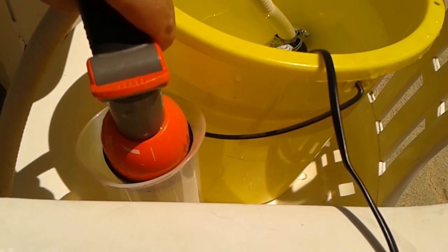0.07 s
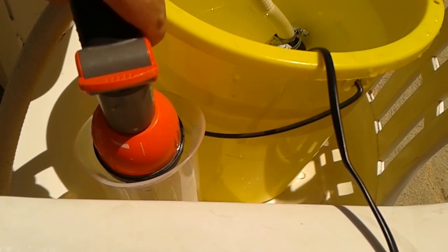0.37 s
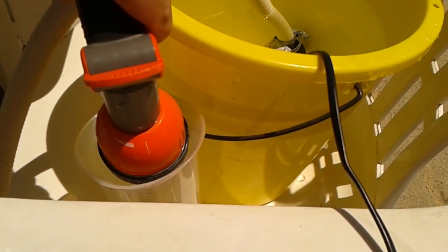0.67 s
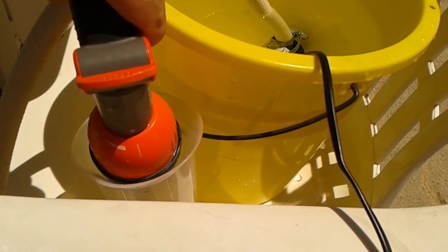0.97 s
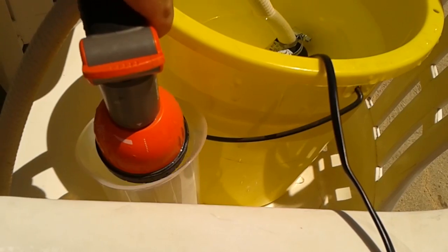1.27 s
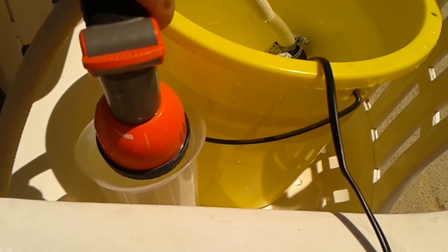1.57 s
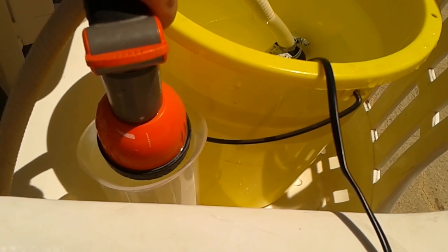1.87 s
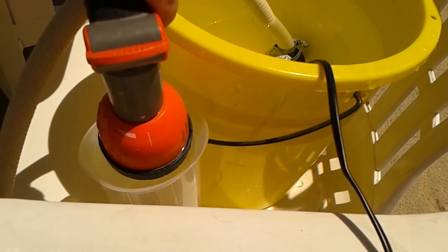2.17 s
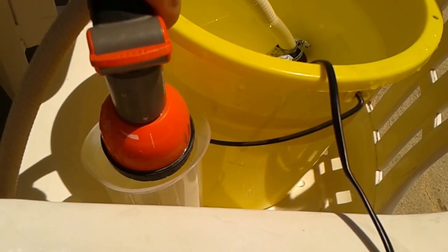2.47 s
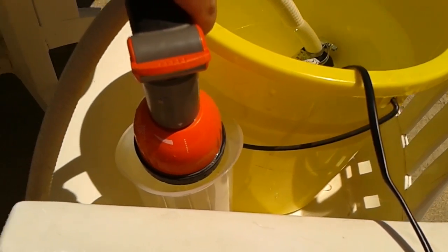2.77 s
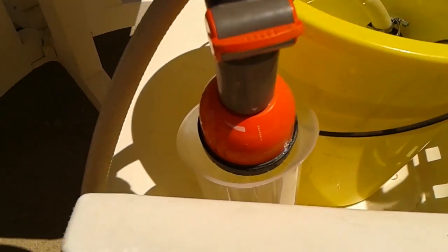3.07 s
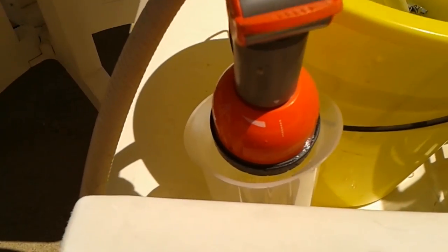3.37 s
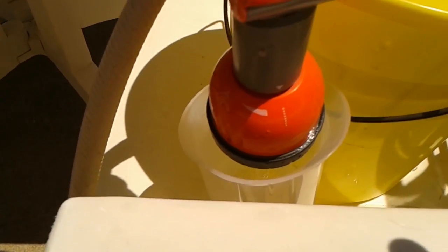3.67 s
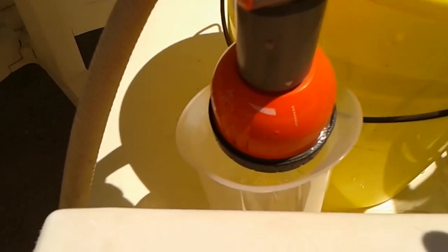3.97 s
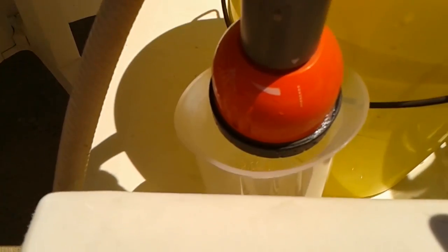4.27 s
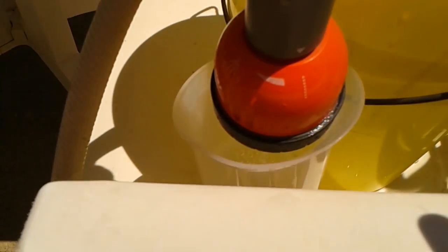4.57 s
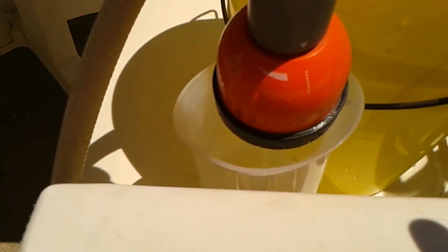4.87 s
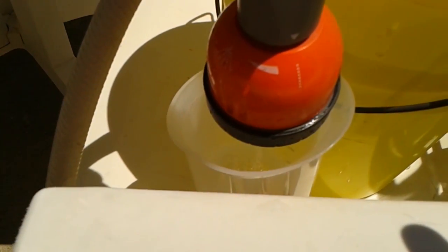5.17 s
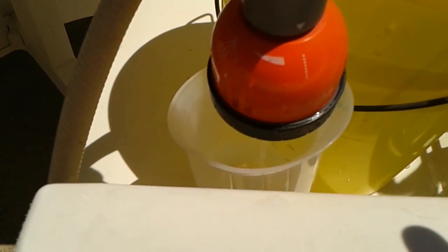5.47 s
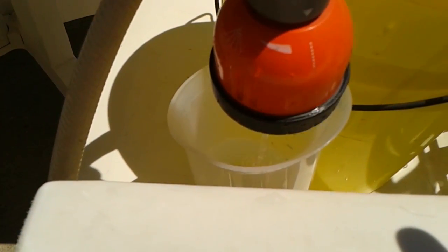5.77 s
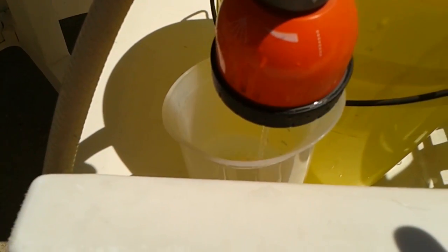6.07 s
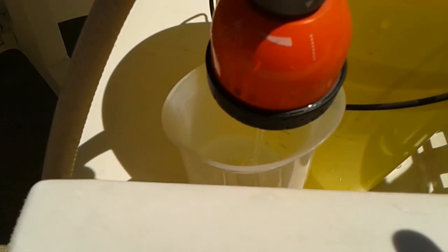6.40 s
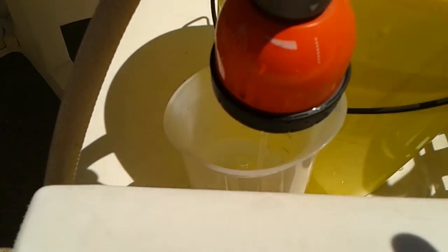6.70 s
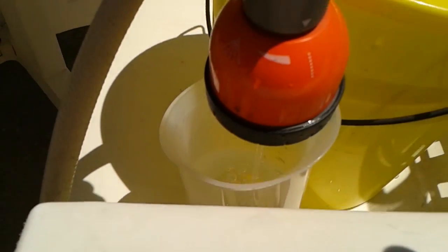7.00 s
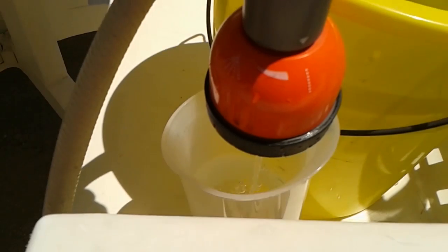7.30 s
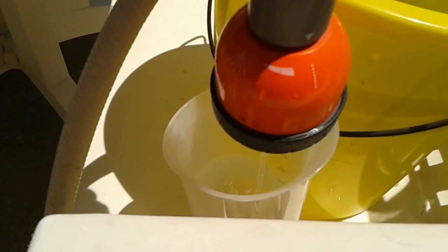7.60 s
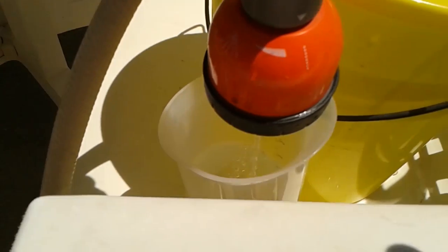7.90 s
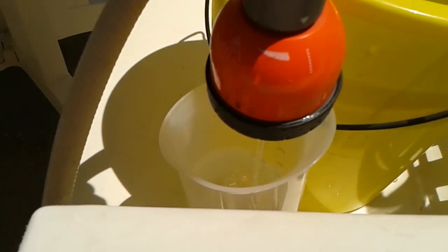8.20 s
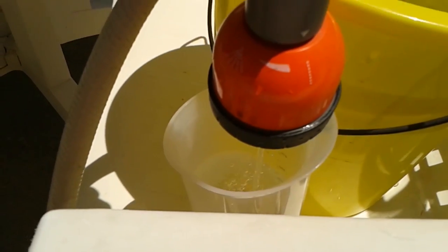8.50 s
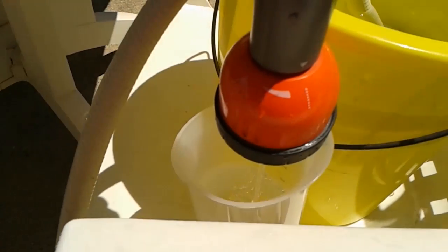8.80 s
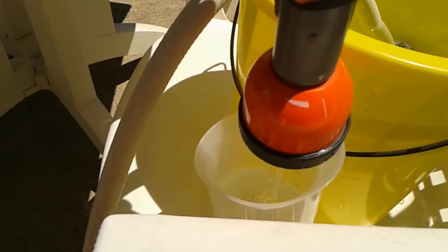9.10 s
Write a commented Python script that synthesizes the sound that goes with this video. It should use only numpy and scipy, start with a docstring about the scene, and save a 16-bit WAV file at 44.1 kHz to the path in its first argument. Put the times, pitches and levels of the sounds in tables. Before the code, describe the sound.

Water trickles and sprays lightly from a hose nozzle into a plastic cup outdoors, while gusts of wind rumble on the microphone.

```python
"""A hand-held nozzle trickles and sprays water into a plastic cup, outdoors.
At first it sits in the mouth of the cup: drops plip as their air pockets oscillate, over patter and hiss,
and the enclosed air rings at narrow resonances while gusts thump the microphone. The wind eases, and by
4.5 s the nozzle is lifted nearly clear, leaving the broader resonances of the open cup. The gusts return
and larger air pockets gulp under the stream. From 8 s the spray fizzes more and the wind buffets hard."""
import sys
import numpy as np
from scipy import signal
from scipy.fft import rfft, irfft, next_fast_len
from scipy.io import wavfile
from scipy.ndimage import uniform_filter1d

SR = 44100
rng = np.random.default_rng(int(sys.argv[2]) if len(sys.argv) > 2 else 0)


def pcm_store(signal):
    """Save signal as 16-bit PCM."""
    levels = np.round(np.clip(np.atleast_2d(signal), -1, 1) * 32767)
    wavfile.write(sys.argv[1], SR, levels.astype(np.int16).T)


N = 407925

# Strength of the spray, in relative levels: t/s, patter/dB, fizz/dB, wash/dB
SPRAY = [(0.0, -38.5, -58.5, -49.5), (1.59, -41, -59.5, -48.5), (2.13, -45, -60, -50.5),
         (3.06, -41, -61.5, -48.5), (3.63, -43.5, -60, -49), (3.89, -40.5, -60.5, -48.5),
         (4.4, -41.5, -61, -49.5), (4.82, -39, -61.5, -47.5), (5.44, -42, -62.5, -49.5),
         (6.9, -43.5, -62.5, -47), (7.57, -41, -58, -47), (8.19, -44.5, -60, -45.5),
         (8.39, -40.5, -59, -46.5), (8.47, -49, -55.5, -43.5), (9.0, -41.5, -55, -46),
         (9.25, -48, -56, -45)]
def water():
    """Source and filter: impacts and air pockets excite the cup; the noise of the spray adds directly."""
    patter_db, fizz_db, wash_db = in_time(SPRAY)
    droplets = patter(per_s=2200, size_db=3.0, clump_db=3.0, cycles=4.9)
    fine = from_db(patter_db - 5.0) * rms_one(cup(droplets, direct_db=-11.0, ring_db=4.5))
    ringing = from_db(patter_db - 17.0) * pings(per_s=140, size_db=-4.5)
    plips = drops(level_db=-1.0, splash_db=-13.5, splash_s=0.022, lead=.38)
    plips = cup(plips, direct_db=3.5, ring_db=-6)
    gulps = glugs(level_db=-2.5, swell_s=0.0067, width_share=0.29, splash_db=-5.5)
    large = wall_echoes(plips + gulps, echo_db=-9.5, t60=0.035)
    hiss = wash(wash_db + 3.0) + fizz(fizz_db + 11.5)
    crackle = spits(level_db=5.0, tick_db=fizz_db + 4, size_db=4.5, tick_s=0.0025)
    return fine + ringing + large + hiss + crackle


def plip(hz, duration):
    """Bubble resonance: a drop's air pocket rings briefly, its envelope peaking at 0.75 durations."""
    t = np.arange(int(5 * duration * SR) + 2) / SR
    age = t / (.75 * duration)
    return (age * np.exp(1 - age)) ** 3 * np.sin(2 * np.pi * hz * t)


# Prominent drops: t/s, relative level/dB, f/Hz, nominal duration/s
DROPS = [(0.0976, -22.5, 1660, 0.00098), (0.202, -27, 4700, 0.00063), (0.205, -30, 1520, 0.0018),
         (0.2385, -31, 1630, 0.0024), (0.344, -29, 4200, 0.0016), (0.398, -32, 2040, 0.0035),
         (0.531, -32, 4930, 0.0014), (0.593, -33, 1800, .0015), (0.6322, -23, 1880, 0.0023),
         (0.6322, -18.5, 3930, 0.00082), (0.642, -29, 3850, 0.0012), (0.752, -30, 4100, 0.00097),
         (0.8115, -28, 2150, 0.00083), (0.831, -29, 1830, 0.0016), (0.993, -38, 1780, .0015),
         (1.053, -26, 2000, 0.00089), (1.231, -29.5, 1570, 0.0015), (1.3835, -40, 1700, .0015),
         (1.397, -32, 1580, 0.002), (1.4265, -32, 1880, .0012), (1.501, -32, 4120, 0.0011),
         (1.509, -26.5, 1420, 0.0011), (1.527, -28, 4340, 0.0025), (1.583, -24, 4500, 0.00072),
         (1.6256, -25, 1880, 0.00085), (1.874, -22, 1690, .0015), (1.876, -31, 1590, .0012),
         (1.904, -30.5, 4300, 0.0015), (2.202, -29.5, 1750, 0.0011), (2.221, -30, 1890, 0.00075),
         (2.2964, -27, 1500, .0028), (2.412, -25.5, 1590, 0.0019), (2.482, -34.5, 1660, 0.0017),
         (2.5395, -33.5, 4630, .0012), (2.5435, -30.5, 1440, 0.0012), (2.578, -27, 1620, 0.0011),
         (2.65, -31, 1580, .0016), (2.868, -23, 1320, 0.0011), (2.876, -21.5, 1540, 0.00097),
         (2.878, -29.5, 1820, 0.0024), (3.077, -32, 1680, .002), (3.09, -27, 1700, 0.0013),
         (3.412, -33, 1860, .002), (3.489, -32, 1800, 0.0012), (3.604, -33.5, 1820, 0.0029),
         (3.844, -30, 4900, 0.00071), (3.859, -31, 3750, .0007), (3.97, -37, 4430, .0012),
         (4.007, -34, 4330, 0.0019), (4.024, -29, 1800, 0.00056), (4.027, -26, 1770, .0013),
         (4.05, -37, 4310, .0012), (4.1133, -33, 4250, .001), (4.148, -32, 1750, 0.002),
         (4.217, -34.5, 5730, .0009), (4.228, -31, 4150, 0.0011), (4.231, -30, 5600, .0008),
         (4.335, -30, 4200, .0008), (4.3513, -25, 4320, 0.0014), (4.4023, -27.5, 4450, 0.00067),
         (4.42, -32, 4500, .0008), (4.507, -30, 1570, 0.0013), (4.5837, -31, 5300, 0.00074),
         (4.671, -33, 4230, 0.002), (4.736, -30, 1850, 0.0015), (4.76, -32, 1660, .0012),
         (4.779, -30, 1560, 0.0013), (4.8814, -27, 1550, .0017), (4.914, -30, 4350, 0.002),
         (4.963, -29, 1880, 0.002), (4.987, -29, 1850, .001), (5.03, -33, 1680, 0.0019),
         (5.053, -31.5, 4300, .0013), (5.137, -36, 5400, .0016), (5.265, -32, 1700, 0.0011),
         (5.3503, -32, 4550, .0014), (5.418, -29, 3960, 0.0012), (5.466, -26, 2000, 0.00056),
         (5.47, -38, 5730, 0.0016), (5.598, -35, 4170, 0.00092), (5.669, -32, 4270, .0013),
         (5.6701, -30, 1580, .0012), (5.69, -28.5, 4450, 0.0015), (5.6976, -28.5, 1440, 0.00099),
         (5.8805, -28, 4400, .001), (6.005, -25, 2010, 0.0017), (6.022, -28, 1730, .0014),
         (6.043, -28.5, 3830, 0.00073), (6.0955, -29, 1950, 0.0017), (6.147, -21, 4300, 0.00062),
         (6.157, -30.5, 1980, 0.0016), (6.156, -34, 3800, .0014), (6.191, -28, 3900, 0.0016),
         (6.1916, -35, 1460, 0.0023), (6.241, -31, 4040, 0.00092), (6.3198, -34, 4360, 0.0011),
         (6.341, -16, 4320, 0.0012), (6.372, -37, 1570, .0025), (6.4445, -30, 4130, 0.0011),
         (6.478, -33, 1330, 0.0066), (6.772, -28, 5000, 0.00038), (6.906, -36, 4640, 0.0015),
         (6.9634, -19.5, 2010, 0.0018), (7.0146, -31.5, 2000, .002), (7.0272, -22.5, 4500, 0.0017),
         (7.289, -29.5, 1920, 0.0015), (7.334, -26, 4270, .0009), (7.387, -28, 4330, 0.0035),
         (7.54, -37, 4380, .0012), (7.634, -27, 4160, 0.00099), (7.641, -29, 1900, 0.0009),
         (7.667, -27, 3780, 0.0012), (7.683, -27.5, 4150, 0.0025), (7.985, -30.5, 4170, .001),
         (8.223, -25.5, 4360, 0.0021), (8.481, -31.5, 4440, 0.0023), (8.51, -42, 4760, .0018),
         (8.5685, -37, 4400, 0.0014), (9.092, -20, 1810, 0.00017), (9.143, -29.5, 4400, 0.0033)]
def drops(level_db, splash_db, splash_s, lead, count=4):
    """Impact and splash: each drop plips amid smaller ones, some just ahead, most thrown up after it."""
    out = np.zeros(N)
    for (s, db, hz, duration), satellites in zip(DROPS + dribble(), rng.random((800, count, 3))):
        add(out, s, from_db(db + level_db) * plip(hz, duration))
        for late, pitch, weak in satellites:
            small_hz = min(hz * 2 ** (pitch - .4), 5200)
            small = from_db(db + splash_db - 13.5 * weak) * plip(small_hz, 3 / small_hz)
            add(out, s + splash_s * (late - lead), small)
    return out


# Two sizes of lesser drop: full rate/(1/s), relative level/dB, f/Hz, spread/octaves, nominal duration/s
LESSER_DROPS = [(24.08, -41, 1755, 0.11, 0.0016), (33.76, -41, 4280, .07, 0.0013)]
# Their flow: t/s, fraction of the full rate
DRIBBLE_FLOW = [(0, .9), (1.3, .55), (2.0, .2), (3.3, .3), (3.8, .7), (4.6, 1), (5.7, .9), (6.7, 0.55),
                (9.25, .45)]
def dribble(spread_db=3.5):
    """Poisson process: lesser drops fall independently at a rate set by the flow; rows as in DROPS."""
    rows, flow = [], in_time(DRIBBLE_FLOW)[0]
    for per_s, db, hz, octaves, duration in LESSER_DROPS:
        times = np.flatnonzero(rng.random(N) < per_s * flow / SR) / SR
        for s, (loud, high) in zip(times, rng.standard_normal((200, 2))):
            rows.append((s, db + spread_db * loud, hz * 2 ** (octaves * high), duration))
    return rows


# Spectrum of the patter: f/Hz, relative level/dB
PATTER_SPECTRUM = [(600, 2.5), (1100, -20.5), (1600, 2), (2000, -5.5), (2800, -5), (3500, 4.5),
                   (4300, -4.5), (5200, -0.5), (6500, -28), (10000, -66)]
def patter(per_s, size_db, clump_db, cycles, bands=26):
    """Shot noise: countless droplets land in clumps, of random size and pitch; the higher ones ring shorter."""
    landings = rng.random(N) < per_s * from_db(clump_db * drift(25)) / SR
    sizes = from_db(size_db * np.minimum(rng.exponential(1, N), 4.5)) * rng.choice([-1, 1], N)
    band, out = rng.integers(0, bands, N), np.zeros(N)
    for k, hz in enumerate(np.geomspace(650, 9000, bands)):
        plips = signal.oaconvolve(sizes * landings * (band == k), plip(hz, cycles / hz))[:N]
        out += from_db(at_hz(PATTER_SPECTRUM, hz)) * np.sqrt(hz) * rms_one(plips)
    return out


def pings(per_s, size_db):
    """Impulse response: droplets flick the wall and set the cup ringing; rms 1."""
    sizes = from_db(size_db * np.minimum(rng.exponential(1, N), 2)) * rng.choice([-1, 1], N)
    flicks = (rng.random(N) < per_s / SR) * sizes
    return rms_one(cup(flicks, direct_db=-47, ring_db=0))


# Position of the nozzle: t/s, lift (0 in the mouth, 1 clear of it)
NOZZLE_LIFT = [(0, 0.04), (1.0, 0.15), (1.6, 0.22), (4.5, 0.95), (5.9, 1), (9.25, 1)]
# Air modes of the cup, covered by the nozzle and open: f/Hz, bandwidth/Hz, relative gain/dB
COVERED_MODES = [(1520, 52, 3), (1680, 41, 1), (1850, 53, 10.5), (2100, 200, 6.5), (2530, 36, 9.5),
                 (3000, 78, 1), (3530, 68, 0), (4040, 105, 6.5)]
OPEN_MODES = [(700, 230, 3), (1444, 190, 5.5), (1880, 160, 6), (3980, 220, -4), (4340, 88, 1.5),
              (5620, 140, 2)]
def cup(x, direct_db, ring_db, slosh_share=0.02507, slosh_hz=4.97):
    """Cavity resonance: covered modes fade into open ones as the nozzle lifts; sloshing wavers them."""
    lift, n = np.clip(in_time(NOZZLE_LIFT)[0], 0, 1), np.arange(N)
    ringing = np.sqrt(1 - lift) * resonate(x, COVERED_MODES) + np.sqrt(lift) * resonate(x, OPEN_MODES)
    waver = slosh_share * SR / (2 * np.pi * slosh_hz) * drift(slosh_hz)  # a varying delay bends the pitch
    return from_db(direct_db) * x + from_db(ring_db) * np.interp(n + waver, n, ringing)


def wall_echoes(x, echo_db, t60):
    """Reverberation: the plastic walls around the cup return a short, decaying scatter of echoes."""
    t = np.arange(SR // 10) / SR
    scatter = rng.standard_normal(len(t)) * from_db(-60 * t / t60) * (t > .0015)
    return x + from_db(echo_db) * signal.fftconvolve(x, scatter / np.linalg.norm(scatter))[:N]


# Large air pockets under the stream: t/s, relative level/dB, f/Hz
GLUGS = [(0.549, -32, 455), (2.868, -39, 865), (4.759, -39, 790), (4.884, -38.5, 700), (5.913, -35.5, 700),
         (6.019, -39, 700), (6.156, -35, 700), (6.187, -36, 715), (6.342, -43, 900), (6.475, -35.5, 830),
         (6.621, -38.5, 696), (6.669, -43, 684), (6.96, -36, 774), (7.032, -35, 800), (8.046, -36, 840),
         (8.509, -39, 720), (8.574, -36, 850), (8.901, -31.5, 760)]
def glugs(level_db, swell_s, width_share, splash_db):
    """Damped resonance: an air pocket breaks up in a hollow swell of churning, with spatter above it."""
    out, t = np.zeros(N), np.arange(SR // 12) / SR
    swell = (t / swell_s * np.exp(1 - t / swell_s)) ** 2
    spatter_band = signal.butter(2, [900, 1900], "band", fs=SR, output="sos")
    for (s, db, hz), (churn, spatter) in zip(GLUGS, rng.standard_normal((len(GLUGS), 2, len(t)))):
        r = np.exp(-np.pi * width_share * hz / SR)
        for _ in range(2):
            churn = signal.lfilter([1, 0, -1], [1, -2 * r * np.cos(2 * np.pi * hz / SR), r * r], churn)
        spatter = signal.sosfilt(spatter_band, spatter)
        splash = rms_one(swell * churn) + from_db(splash_db) * rms_one(swell * spatter)
        add(out, s, from_db(db + level_db) * splash * np.sqrt(np.mean(swell ** 2)))
    return out


# Spectrum of the splashing water: f/Hz, relative level/dB
WASH_SPECTRUM = [(300, -6), (480, -3.5), (700, -1), (1000, 0.5), (1500, -2.5), (2100, -2.5), (2900, -10),
                 (4300, -7), (6000, -26.5), (9000, -31)]
def wash(level_db):
    """Incoherent summation: many splashes merge into broadband noise of wavering level."""
    return from_db(level_db + 1.23 * drift(9.7)) * noise(WASH_SPECTRUM)


# Spectrum of the fine spray: f/Hz, relative level/dB
FIZZ_SPECTRUM = [(2500, 12), (4500, 13.5), (6000, 4), (7500, -1), (10000, -6.5), (11500, -15.5),
                 (14500, -35)]
def fizz(level_db):
    """Incoherent summation: the finest spray merges into a high, wavering hiss."""
    return from_db(level_db + 1.15 * drift(5.4)) * noise(FIZZ_SPECTRUM)


# Strongest spits of spray: t/s, relative level/dB, nominal duration/s
SPITS = [(0.09, -45, .014), (0.202, -46, .006), (0.216, -43, 0.0051), (0.24, -45, 0.022), (2.541, -46, .01),
         (3.584, -55, .02), (3.654, -52, .014), (3.89, -50, 0.018), (4.598, -48, .01), (4.733, -47, 0.014),
         (5.177, -46, 0.0061), (5.368, -48, .007), (8.469, -47, 0.0052), (8.482, -47, 0.0068),
         (8.515, -41, 0.0077), (8.538, -48, 0.018), (8.576, -42, .01), (8.892, -43, 0.024),
         (9.003, -45, .006)]
# Their spectrum: f/Hz, relative level/dB
SPIT_SPECTRUM = [(3000, 11), (5000, 15), (7000, 1.5), (9300, 1.5), (10800, -2), (11800, -19), (14000, -19)]
def spits(level_db, tick_db, size_db, tick_s, per_s=90):
    """Impact noise: fine spray hits the plastic in bright bursts, with faint ticks between them."""
    ticks = (rng.random(N) < per_s / SR) * from_db(tick_db + size_db * np.minimum(rng.exponential(1, N), 3))
    envelope = signal.lfilter([1], [1, -np.exp(-1 / (tick_s * SR))], ticks + 1e-18)
    t = np.arange(-SR // 20, SR // 20) / SR
    for s, db, duration in SPITS:
        add(envelope, s + t[0], from_db(db + level_db) * np.exp(-np.abs(t) / (duration / 2)))
    return envelope * noise(SPIT_SPECTRUM)


# Spectra of the wind's deep rumble and higher flutter: f/Hz, relative level/dB
RUMBLE_SPECTRUM = [(20, -3), (35, -1), (55, 1), (95, 2.5), (140, -7), (200, -15), (400, -50)]
FLUTTER_SPECTRUM = [(70, 0.5), (120, 3), (170, 0.5), (230, -4), (300, -9.5), (420, -18.5), (550, -31.5),
                    (800, -30)]
# Weight of the flutter in the wind: t/s, relative level/dB
FLUTTER_LEVEL = [(0, -16.5), (3, -12.5), (4.6, -14), (6.1, -11.5), (6.6, -15.5), (7.9, -18), (8.3, -6.5),
                 (9.25, -6)]
def wind(rumble_db, steepening, flutter_depth_db, puff_db, eddies_db):
    """Turbulent pressure on the microphone: rumble follows the gusts, and flutter grows more steeply."""
    gust_db = wind_strength() + puff_db * np.tanh(drift(11.5))
    rumble = from_db(gust_db + rumble_db) * turbulence(RUMBLE_SPECTRUM)
    harder_db = steepening * (gust_db - gust_db.mean())
    flutter = rms_one(turbulence(FLUTTER_SPECTRUM) * from_db(flutter_depth_db * np.tanh(drift(33.0))))
    flutter *= from_db(gust_db + in_time(FLUTTER_LEVEL)[0] + harder_db)
    return rumble + flutter + from_db(gust_db + eddies_db) * puffs(per_s=12, hz=90)


# Light air between gusts: t/s, relative level/dB
BREEZE = [(0, -35), (0.8, -40.5), (1.5, -48), (2.6, -55), (3.0, -41), (4.5, -49), (6.0, -40.5),
          (7.3, -43.5), (9.25, -33.5)]
# Gusts: t/s, duration/s, relative level/dB
GUSTS = [(0.081, 0.11, -30), (0.37, 0.092, -32), (0.623, 0.053, -28.5), (1.06, 0.15, -45),
         (2.758, 0.23, -38), (3.136, 0.046, -34), (3.435, 0.06, -37), (4.261, 0.082, -40.5),
         (4.626, 0.26, -30), (4.95, 0.095, -31), (5.086, 0.14, -30), (5.277, 0.059, -31),
         (5.552, 0.15, -35), (5.954, 0.28, -32), (6.494, 0.044, -33), (6.723, 0.026, -33.5),
         (7.378, 0.064, -35.5), (7.591, 0.08, -31.5), (7.836, 0.048, -31), (8.044, 0.071, -32),
         (8.157, 0.18, -30.5), (8.413, 0.21, -31.5), (8.718, 0.13, -32.5), (8.953, 0.076, -30.5),
         (9.142, 0.12, -32)]
def wind_strength(attack_s=0.0068, release_s=0.038):
    """Addition of powers: each gust rises out of the breeze, holds and dies away; the sum in dB."""
    t, power = np.arange(N) / SR, from_db(in_time(BREEZE)[0]) ** 2
    for start, length, db in GUSTS:
        attack = np.clip((t - start) / attack_s + .5, 0, 1)
        release = np.exp(-np.clip((t - start - length) / release_s, 0, 20))
        power += (from_db(db) * attack * release) ** 2
    return 10 * np.log10(power)


def turbulence(spectrum):
    """Random pressure fluctuation, divided by its slow envelope to leave the quick lumps; rms 1."""
    flow = noise(spectrum)
    swell = np.sqrt(uniform_filter1d(flow ** 2, size=SR // 12) + 1e-9)
    return rms_one(flow / swell)


def eddy(hz, lean, swings=1.02):
    """Forced motion: an eddy rocks the diaphragm in a Gaussian pulse; its phase leans to push or pull."""
    cycles = hz * np.arange(-SR // 50, SR // 50) / SR
    return np.exp(-(2 * cycles / swings) ** 2) * np.cos(2 * np.pi * (cycles + lean))


def puffs(per_s, hz):
    """Poisson process: small eddies arrive at random and push either way."""
    pushes = (rng.random(N) < per_s / SR) * rng.uniform(0.59, 1, N) * rng.choice([-1, 1], N)
    return signal.oaconvolve(pushes, eddy(hz, 0), "same")


# Large eddies striking the microphone: t/s, relative level/dB, f/Hz
BUFFETS = [(0.107, -22, 85), (0.134, -9.5, 155), (0.177, -12.5, 130), (0.194, -9, 151), (0.247, -19, 114),
           (0.396, -21, 114), (0.473, -20.5, 156), (0.607, -13.5, 102), (0.642, -20, 165),
           (0.716, -19, 119), (0.811, -24, 150), (2.996, -32, 100), (3.164, -21, 109), (4.646, -24, 90),
           (4.711, -21, 115), (4.729, -17.5, 125), (4.782, -21.5, 85), (4.818, -22.5, 100),
           (4.865, -22, 105), (4.876, -21.5, 180), (4.991, -22, 125), (5.025, -21, 115), (5.036, -19, 159),
           (5.188, -22, 120), (5.313, -25, 125), (5.96, -24, 105), (6.007, -24, 120), (6.046, -23, 130),
           (6.192, -18, 111), (6.533, -32, 90), (8.047, -20, 141), (8.107, -24, 140), (8.167, -24, 130),
           (8.222, -19.5, 130), (8.251, -16, 140), (8.266, -19, 165), (8.311, -11, 131), (8.518, -18, 120),
           (8.578, -22, 180), (8.73, -15.5, 156), (8.817, -12.5, 190), (8.846, -18, 166), (8.87, -25, 170),
           (8.921, -19.5, 155), (8.97, -19, 150), (9.014, -22, 155), (9.087, -17, 135), (9.149, -19.5, 194)]
def buffets(level_db, deep_db, edge_db):
    """Superposed scales of turbulence: each thump has a slow swell under it and a sharp swirl on top."""
    out = np.zeros(N)
    for s, db, hz in BUFFETS:
        lean = rng.random(3)
        swell = from_db(deep_db) * eddy(hz / 2, lean[1])
        swirl = from_db(edge_db) * eddy(2.05 * hz, lean[2])
        add(out, s - .02, from_db(db + level_db) * (eddy(hz, lean[0]) + swell + swirl))  # centred on s
    return out


# Spectrum of the outdoor background: f/Hz, relative level/dB
OUTDOOR_SPECTRUM = [(25, -38), (70, -5), (130, -0.5), (220, 1.5), (330, -1.5), (480, -12.5), (1000, -13),
                    (3000, -56)]
def outdoor_hush(level_db):
    """Stationary noise: the low, steady hush of the outdoors."""
    return from_db(level_db) * noise(OUTDOOR_SPECTRUM)


def from_db(db):
    """Level in decibels to amplitude ratio."""
    return 10 ** (np.asarray(db) / 20)


def rms_one(x):
    """Normalisation to rms 1."""
    return x / np.sqrt(np.mean(x ** 2) + 1e-20)


def in_time(rows):
    """Linear interpolation of each column at every sample."""
    s, *columns = np.transpose(rows)
    return [np.interp(np.arange(N) / SR, s, c) for c in columns]


def at_hz(spectrum, hz):
    """Interpolation of a spectrum on a log-frequency axis."""
    frequencies, levels = np.transpose(spectrum)
    return np.interp(np.log(hz), np.log(frequencies), levels)


def drift(corner_hz):
    """Low-pass noise: a slow random wander of rms 1, computed every 40 samples."""
    r = np.exp(-80 * np.pi * corner_hz / SR)
    slow = signal.lfilter([1], [1, -2 * r, r * r], rng.standard_normal(N // 40 + 2002))[2000:]
    return np.interp(np.arange(N) / 40, np.arange(len(slow)), rms_one(slow))


def noise(spectrum):
    """Spectral shaping: white noise takes the given spectrum, falling away beyond its ends; rms 1."""
    size = next_fast_len(N)
    hz = np.maximum(np.arange(size // 2 + 1) * SR / size, 1)
    ends = (1 + (spectrum[0][0] / hz) ** 4) * (1 + (hz / spectrum[-1][0] / 2) ** 4)
    shaped = rfft(rng.standard_normal(size)) * from_db(at_hz(spectrum, hz)) / np.sqrt(ends)
    return rms_one(irfft(shaped, size)[:N])


def add(track, s, sound):
    """Superposition of a sound on the track from time s."""
    start = int(np.clip(s * SR, 0, N - 1))
    track[start:start + len(sound)] += sound[:N - start]


def resonate(x, modes):
    """Modal summation: damped resonators driven in parallel."""
    out = np.zeros(N)
    for hz, width, db in modes:
        r = np.exp(-np.pi * width / SR)
        feedback = [1, -2 * r * np.cos(2 * np.pi * hz / SR), r * r]
        out += from_db(db) * signal.lfilter(np.array([1, 0, -1]) * (1 - r * r) / 2, feedback, x + 1e-18)
    return out


def scene():
    """Superposition of water, wind and outdoor hush in one channel."""
    hush = outdoor_hush(level_db=-50.5)
    gusts = wind(rumble_db=-3.0, steepening=0.55, flutter_depth_db=6.0, puff_db=3.5, eddies_db=1.0)
    thumps = buffets(level_db=-1.5, deep_db=-11, edge_db=-13)
    return (water() + gusts + thumps + hush)[None, :]


def record(dry):
    """Band limiting: the microphone loses the bass below 30 Hz; the top is cut steeply at 14.7 kHz."""
    thinned = signal.sosfilt(signal.butter(2, 30, "high", fs=SR, output="sos"), dry)
    return signal.sosfilt(signal.ellip(12, .1, 90, 14700, fs=SR, output="sos"), thinned)


dry = scene()
out = record(dry)
pcm_store(out)
```